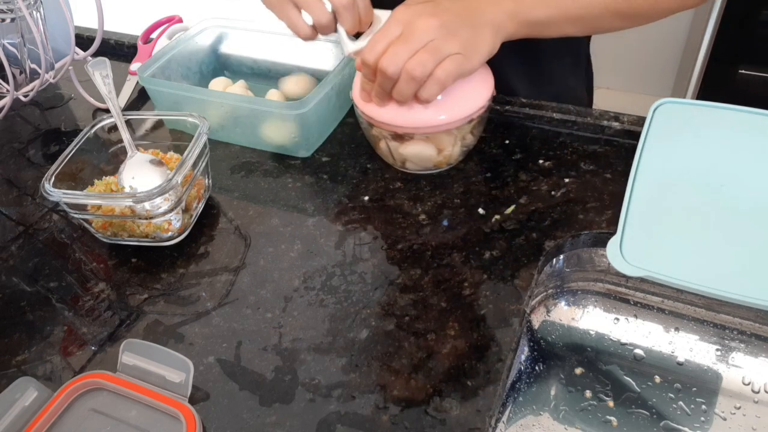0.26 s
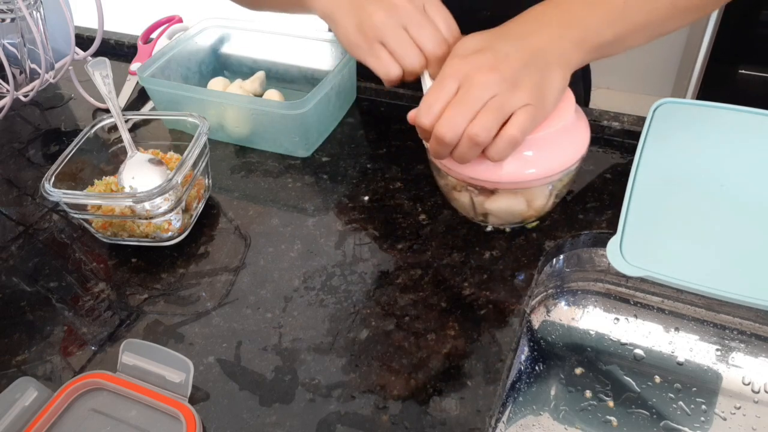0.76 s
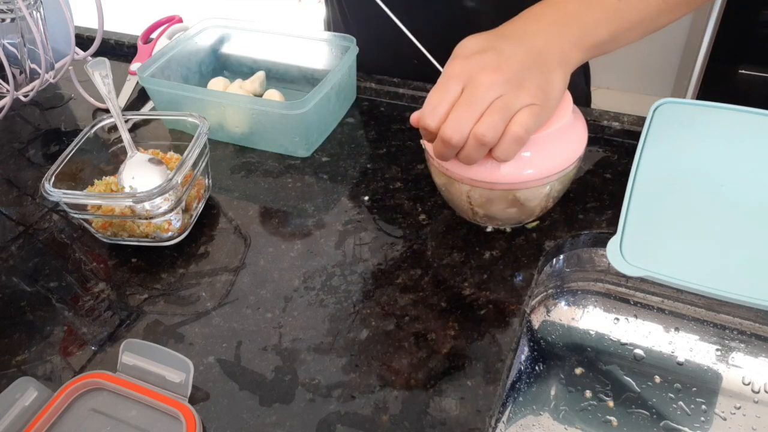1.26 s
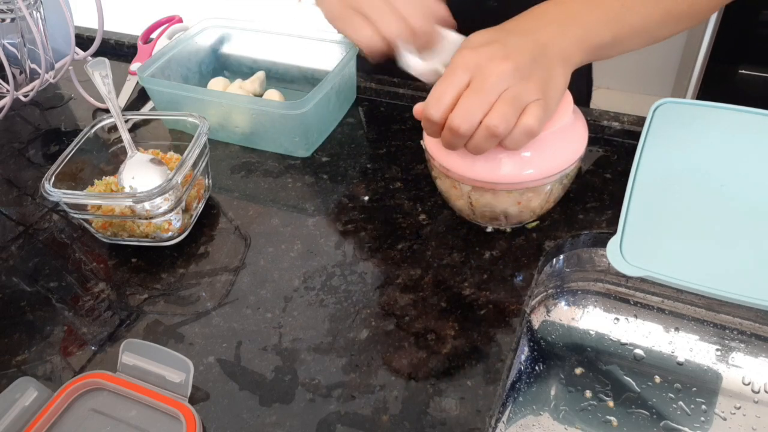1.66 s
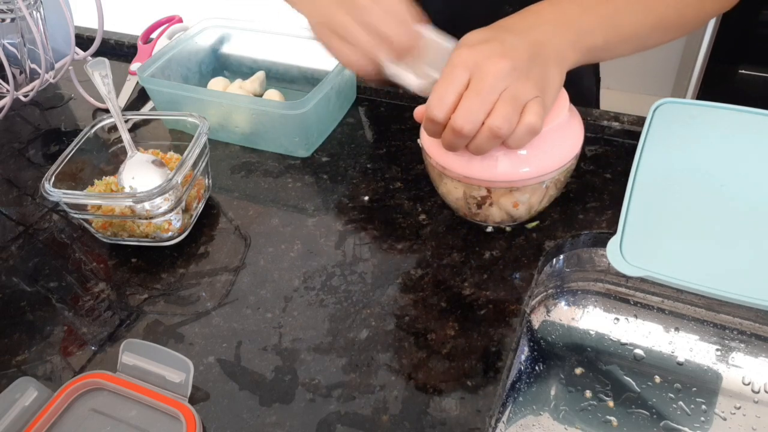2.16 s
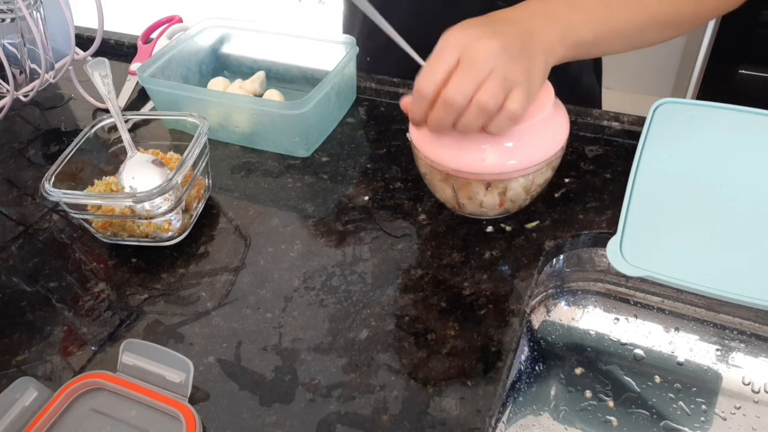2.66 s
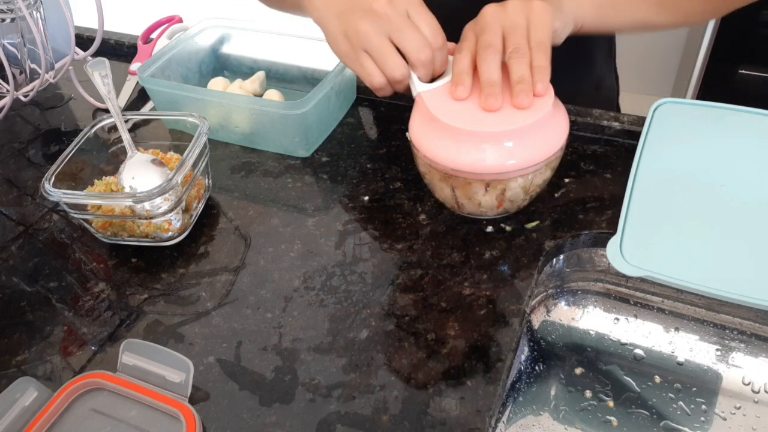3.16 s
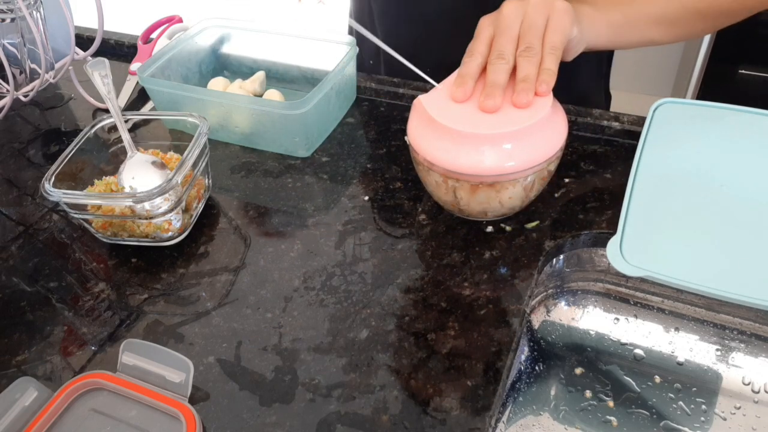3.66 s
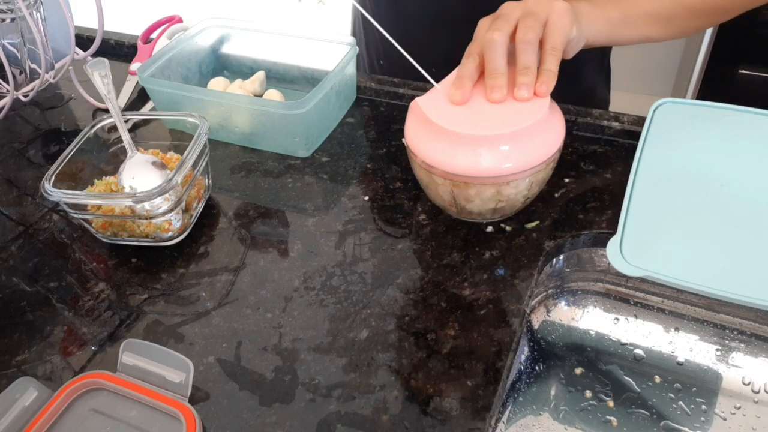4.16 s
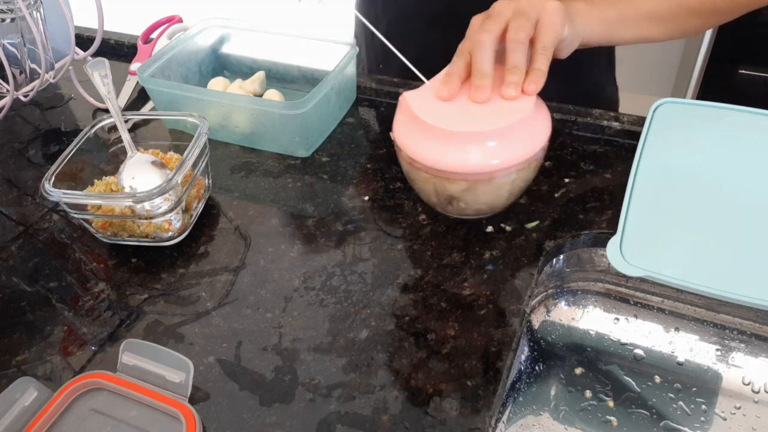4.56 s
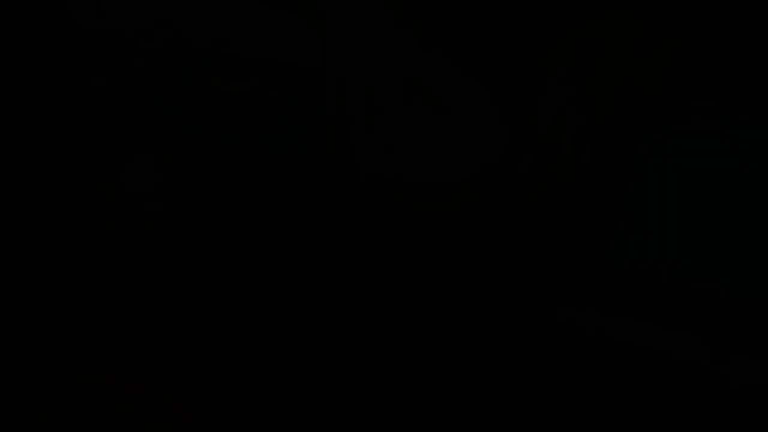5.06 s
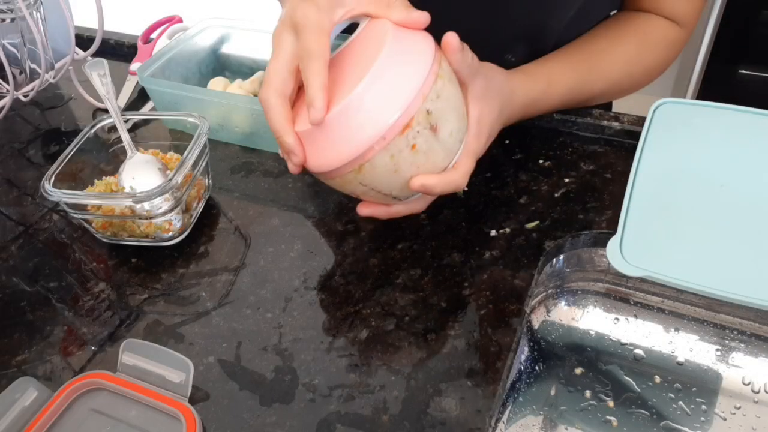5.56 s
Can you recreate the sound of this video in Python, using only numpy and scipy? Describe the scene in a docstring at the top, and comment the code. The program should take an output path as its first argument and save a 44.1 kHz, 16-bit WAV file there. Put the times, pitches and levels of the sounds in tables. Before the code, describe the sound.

In a small kitchen, close stereo microphones catch a plastic chopper knocked and shifted on a stone counter, then three rattling cord pulls with garlic hitting the bowl. Cord rewinds hiss and snap between them. A sharp knock leads to three more pulls, then a few loose knocks and quiet room tone.

```python
"""A faint hum and steady air noise fill a kitchen while a hand chopper is knocked about on a stone counter.
From about one second, six pulls of its cord throw garlic at the plastic bowl: random taps through resonances.
Between and after the pulls a spring rewinds the cord, which hisses, snaps and rings the lid.
More knocks, hard contacts with a short chatter, come near the middle and the end. Two microphones hear it all."""
import sys
import numpy as np
from scipy import signal
from scipy.fft import rfft, irfft
from scipy.io import wavfile
from scipy.ndimage import uniform_filter1d

SR = 44100
rng = np.random.default_rng(int(sys.argv[2]) if len(sys.argv) > 2 else 0)


def master(y):
    """Save y as 16-bit WAV."""
    cut = np.clip(np.atleast_2d(y).T, -1, 1)
    pcm = np.round(cut * 32767)  # scale
    wavfile.write(sys.argv[1], SR, pcm.astype(np.int16))


N = 255780  # samples, 5.8 s


def gain_of(db):
    """Turns decibels into gain."""
    return 10 ** (np.asarray(db) / 20)


def evened(x):
    """Scales a signal to an rms of 1."""
    return x / np.sqrt(np.mean(x ** 2) + 1e-20)


def read(points, hz):
    """Reads a table of values by frequency, with the frequencies spaced as on a log axis."""
    f, value = np.transpose(points)
    return np.interp(np.log(hz + 1), np.log(f + 1), value)


def columns(rows):
    """Draws every column of a table as a curve, one value per sample."""
    s, *values = np.transpose(rows)
    return [np.interp(np.arange(N) / SR, s, v) for v in values]


def kernel(spectrum, peaks=()):
    """Makes the sound of one tap, of energy 1, from a spectrum and resonance peaks."""
    hz = abs(np.fft.fftfreq(8192, 1 / SR))
    db = read(spectrum, hz) + sum(boost / (1 + (2 * (hz - f) / width) ** 2) for f, width, boost in peaks)
    log_gain = np.log(gain_of(np.maximum(db, -100)))
    # minimum phase: the sound starts at once and nothing comes before it
    h = np.fft.ifft(np.exp(np.conj(signal.hilbert(log_gain)))).real[:4096]
    return h / np.linalg.norm(h)


def ring(modes):
    """Adds up dying sines, of energy 1 together; a wider resonance dies sooner."""
    t = np.arange(3000) / SR
    h = sum(gain_of(db) * np.exp(-np.pi * width * t) * np.sin(2 * np.pi * hz * t) for hz, width, db in modes)
    return h / np.linalg.norm(h)


def through(x, h):
    """Passes every channel through one response."""
    return signal.oaconvolve(np.atleast_2d(x), h[None], axes=1)[:, :N]


def impacts(per_s, spread_db, smooth, alike, clump_db, clump_s):
    """Random taps of uneven size over smooth noise, in clumps; each microphone hears a share of its own."""
    luck, size, noise = rng.random((3, N)), rng.exponential(1, (3, N)), rng.standard_normal((4, N))
    sizes = gain_of(spread_db * np.minimum(size, 4))
    taps = np.sign(noise[:3]) * sizes * (luck < per_s / SR)
    width = max(round(clump_s * SR), 2)
    slow_noise = uniform_filter1d(uniform_filter1d(noise[3], width), width)
    clumps = gain_of(clump_db * evened(slow_noise))
    both, *own = evened((evened(taps) + smooth * noise[:3]) * clumps)
    # the taps land all round the bowl, but long waves reach both microphones alike
    own = signal.sosfilt(signal.butter(4, 480, "high", fs=SR, output="sos"), own)
    alike = np.clip(alike, 0, 1)
    return np.sqrt(alike) * both + np.sqrt(1 - alike) * own


# How strong the hum is. Each row: time in seconds, level in dB.
HUM_LEVELS = [(0.0, -54), (0.89, -53), (1.06, -67), (1.21, -49), (1.55, -63), (2.03, -60), (2.34, -66),
              (2.62, -46.5), (3.62, -54.5), (4.65, -46), (5.15, -65), (5.8, -59)]
# The colour of the room noise. Each row: frequency in Hz, relative level in dB per Hz.
AIR_COLOUR = [(15, -5), (25, -21), (65, -25), (103, -3.5), (131, 2.5), (192, -3.5), (232, -13), (339, -15),
              (2400, -40), (2670, -27), (5570, -30), (6040, -25), (8370, -42), (15200, -36), (16500, -72)]
AIR_DB, HUM_HZ, HUM_WANDER_HZ = -54, 86.6, 1.07


def background():
    """Steady room noise, alike in the bass, and a low hum that comes and goes and wanders in pitch."""
    a, b = rng.standard_normal((2, N))
    apart = signal.sosfilt(signal.butter(2, 350, "high", fs=SR, output="sos"), b - a)
    air = gain_of(AIR_DB) * through([a, a + apart], kernel(AIR_COLOUR))
    wander = evened(uniform_filter1d(rng.standard_normal(N), 6000))
    hum = np.sqrt(2) * np.sin(2 * np.pi * np.cumsum(HUM_HZ + HUM_WANDER_HZ * wander) / SR)
    return air + gain_of(columns(HUM_LEVELS)[0]) * hum


# How long the echoes last. Each row: frequency in Hz, time to fall by 60 dB in seconds.
ECHO_TIMES = [(150, 0.26), (500, 0.49), (2000, 0.39), (5000, 0.39), (12000, 0.15)]


def kitchen(x):
    """Sparse echoes of random sign, other ones for each microphone; each band dies at its own speed."""
    taps = np.zeros((2, SR))
    at = np.arange(100, SR - 20, 20) + rng.integers(0, 20, (2, (SR - 101) // 20))
    np.put_along_axis(taps, at, rng.choice([-1., 1.], at.shape), 1)
    hz, t, bands = signal.stft(taps, SR, nperseg=128)
    fade = gain_of(-60 * t / read(ECHO_TIMES, hz)[:, None])
    tail = signal.istft(bands * fade, SR, nperseg=128)[1]
    # both microphones share the bass
    tail[1] += signal.sosfiltfilt(signal.butter(2, 450, fs=SR, output="sos"), tail[0] - tail[1])
    return signal.fftconvolve(x[None], tail / np.linalg.norm(tail[0]), axes=1)[:, :N]


# Hands shifting the bowl on the counter. Each row: time in seconds, dull thuds in dB, sharp ticks in dB.
HANDLING = [(0.0, -36.5, -53), (0.12, -76, -67), (0.17, -31, -51), (0.22, -53, -72), (0.45, -35, -54),
            (0.69, -48.5, -61.5), (0.95, -54, -62), (3.0, -89, -55), (3.28, -52, -67.5), (3.31, -45.5, -57),
            (3.4, -80, -87), (5.4, -50.5, -53), (5.8, -60, -77)]


def handling_power():
    """Hands shift the bowl; gives the power of the thuds and the ticks."""
    return gain_of(columns(HANDLING)) ** 2


# Bowl, lid and handle knocked about. Each row: time in seconds, then in dB the crack, counter boom,
# body knock, lower lid ring, upper lid ring and loose rattle.
KNOCKS = [(0.0511, -54, -41, -30, -35, -41, -41), (0.1786, -32, -34, -21, -39, -33, -42),
          (0.2276, -5.5, -60, -9, -31, -18, -24), (0.247, -40, -50, -13, -45, -45, -40),
          (0.2683, -9.5, -60, -14, -46, -42, -23.5), (0.352, -45, -48, -27, -46, -48, -42),
          (0.3885, -35, -35, -24, -49, -23, -49), (0.4067, -33, -54, -41, -46, -41, -50),
          (0.4464, -42, -49, -38, -29, -31, -45), (0.4823, -22.5, -46, -29, -24.5, -46, -34),
          (0.4978, -19.5, -39, -18, -25, -18, -39), (0.548, -43, -47, -20.5, -50, -40, -54),
          (0.684, -47, -32, -35, -61, -55, -51), (0.8101, -37, -32.5, -53, -40, -60, -45.5),
          (2.8902, -13.5, -55, -22.5, -54, -11, -31.5), (2.9076, -20, -55, -32, -48, -27, -52),
          (3.268, -56, -51, -57, -48, -39, -61), (3.3014, -36, -38, -38, -44, -48, -50),
          (5.2178, -12.5, -49, -44, -20, -38, -27.5), (5.247, -11, -51, -36, -51, -49, -29),
          (5.2644, -4.5, -59, -39, -18.5, -20, -45), (5.2671, -6.5, -59, -42, -17, -25, -32),
          (5.6092, -58, -38, -66, -58, -59, -73), (5.7244, -63, -30.5, -62, -67, -59.5, -58.5)]


def knock_blows():
    """Lists the knocks as rows for blows(), with a fine tick softer than the crack."""
    return [(s, crack, *parts, crack - 26) for s, crack, *parts, _ in KNOCKS]


def column(values):
    """Stands values up, one below the other."""
    return np.reshape(values, (-1, 1))


# What a knock shakes loose, against its rattle level. In order: thuds, ticks, hiss, lower and upper ring, in dB.
RATTLE_DB = [-10, -15, -13, -16, -21]
# How fast each of these fades, in dB per second.
RATTLE_FADE = [119, 160, 147, 117, 180]


def rattle_shapes(t):
    """Each knock shakes loose parts, which rattle and fade; gives start and levels in dB."""
    shapes = []
    for s, *_, rattle_db in KNOCKS:
        fade_db = column(RATTLE_FADE) * np.maximum(t - s, 0)
        shapes.append((s, rattle_db + column(RATTLE_DB) - fade_db))
    return shapes


REGRIP_S = 2.85  # the hand on the lid goes flat: the upper ring takes over from the lower


def lid_rings(s, db, muted_db):
    """Levels of the lower and the upper ring; the hand holds one of them down."""
    return (db, db + muted_db) if s < REGRIP_S else (db + muted_db, db)


# The rewinding cord catches and snaps against the lid. Each row: time in seconds, crack in dB, lid ring in dB.
SNAPS = [(1.505, -12, -9), (1.5374, -17, -9), (1.5135, -20, -10), (1.548, -22, -12), (2.1465, -9, -5),
         (2.1561, -24, -10), (2.181, -28, -14), (2.1724, -26, -13), (2.1884, -29, -19), (2.2494, -18, -25),
         (2.7057, -10.5, -10.5), (3.7803, -6.5, -6), (4.3495, -15, -5), (4.374, -12, -6), (4.9374, -18, -6),
         (4.9594, -16, -6), (4.9806, -14, -5), (5.0544, -15, -22)]
SNAP_BODY_DB = -14  # body knock against crack; the boom lies as far below again


def snap_blows():
    """Lists the snaps of the cord as rows for blows()."""
    return [(s, crack, crack + 2 * SNAP_BODY_DB, crack + SNAP_BODY_DB, *lid_rings(s, lid, -18), crack - 15)
            for s, crack, lid in SNAPS]


# The hardest cloves the blades strike. Each row: time in seconds, crack in dB, thump in dB, lid ring in dB.
STRIKES = [(0.9764, -28, -28, -41), (1.0093, -22, -16, -30), (1.1394, -8.5, -10.5, -17),
           (1.1815, -21, -27, -18), (1.2042, -10.5, -40, -30), (1.2831, -11.5, -14, -35),
           (1.3546, -7, -19, -26), (1.7685, -26, -39, -38), (1.995, -16.5, -20, -30),
           (2.437, -18, -36, -36), (3.97, -26, -33, -25), (1.846, -9, -11, -21), (2.3294, -30, -23.5, -34),
           (2.3847, -22, -22, -26), (2.4735, -2, -16, -10), (3.3688, -47, -30, -37),
           (3.3991, -31, -30, -43), (3.4253, -22, -20, -20), (3.5272, -9, -18, -12), (4.075, -26, -20, -39),
           (4.1953, -10, -24, -33), (4.7072, -14, -24, -9)]


def strike_blows():
    """Lists the strikes of the blades as rows for blows(), the boom 2 dB below the thump."""
    return [(s, crack, thump - 2, thump, *lid_rings(s, lid, -12), crack - 25)
            for s, crack, thump, lid in STRIKES]


# How the counter rings. Each row: frequency in Hz, width in Hz, relative level in dB.
COUNTER = [(123, 49, -18), (192.5, 4.7, -9), (324, 170, 6.5)]
# How the hollow body rings. Each row: frequency in Hz, width in Hz, relative level in dB.
BODY = [(424, 79, -33), (560, 22, 6), (694, 280, 29.5), (970, 140, 12.5)]


def blows():
    """Each blow is one hard contact and a few milliseconds of chatter into every part of the chopper."""
    # each row: seconds, then crack, boom, body, lower ring, upper ring and fine tick in dB
    s, *parts_db = np.transpose(knock_blows() + strike_blows() + snap_blows())
    t = np.arange(500) / SR
    bursts = .25 * rng.standard_normal((len(s), 2, len(t))) * np.exp(-t / .002)
    bursts[:, :, 0] = 1  # the contact itself
    at = np.round(s * SR).astype(int)[:, None] + np.arange(len(t))
    parts = [kernel(TICK, BOWL), ring(COUNTER), ring(BODY), ring(LID_LOW), ring(LID_HIGH), kernel(HISS)]
    chatters = [1, 0.13, 0.051, 0.15, 0.2, 0.17]  # share of the chatter that each part feels
    out = np.zeros((2, N))
    for h, db, chatter in zip(parts, parts_db, chatters):
        weight = np.where(t > 0, chatter, 1) * gain_of(db)[:, None]
        drive = np.zeros((2, N))
        for ear in range(2):
            np.add.at(drive[ear], at, bursts[:, ear] * weight)
        out += through(drive, h / abs(h).max())
    return out


# The spring winds the cord back. Each row: start in seconds, catch in seconds, length of the run in seconds,
# how many times the usual braking, then in dB the dull thuds, sharp ticks, hiss, lower and upper lid ring.
REWINDS = [(1.434, 1.501, 0.06, 1.01, -33.5, -33, -30.5, -32, -32),
           (2.066, 2.151, 0.035, 0.94, -35, -30.5, -28, -22.5, -53),
           (2.217, 2.253, 0.018, 1.44, -40, -29.5, -30, -22.5, -35.5),
           (2.627, 2.701, 0.085, 1.23, -33, -34, -30, -22.5, -45),
           (3.705, 3.772, 0.076, 1, -31, -28.5, -27.5, -42, -33.5),
           (4.285, 4.35, 0.1, 1.6, -33, -29, -29, -43, -31),
           (4.89, 4.937, 0.06, 1.05, -33, -28, -26, -42, -29),
           (4.975, 5.037, 0.031, 4.3, -41, -28.5, -30, -29.5, -28.5),
           (5.06, 5.108, 0.043, 0.75, -49.5, -56, -40, -29.5, -55)]
# The five sounds before the catch. Each row: level at the start in dB, level just before the catch in dB,
# both against the row above and never over it.
WIND_UP = [(19, 16), (-25, 3.5), (-13, -1), (-17, -19), (-4, -22)]
# How fast each of the five sinks while the cord runs, in dB per second.
RUN_SAG = [31, 7.7, 30, 180, 24]
# How fast each of the five sinks when the cord slows, in dB per second before the braking multiplies it.
SLACK = [54, 124, 129, 119, 124]


def rewind_shapes(t):
    """The cord winds up, catches, runs and slows; gives start and levels in dB."""
    first_db, last_db = map(column, np.transpose(WIND_UP))
    shapes = []
    for start, catch, run, braking, *levels_db in REWINDS:
        before = first_db + (last_db - first_db) * (t - start) / (catch - start)
        running = column(RUN_SAG) * np.minimum(t - catch, run)
        slowing = braking * column(SLACK) * np.maximum(t - catch - run, 0)
        shape = np.where(t < catch, np.minimum(before, 0), -running - slowing)
        shapes.append((start, column(levels_db) + shape))
    return shapes


# The colour of the cord's hiss. Each row: frequency in Hz, relative level in dB per Hz.
HISS = [(2060, -31), (3500, -1), (4330, 4.5), (4650, -2), (5390, 7.5), (6750, -1), (7340, 5), (8900, -3),
        (12000, 6), (13400, -6), (15300, -0.5), (16000, -27), (16300, -58)]
# The lower ring of the lid. Each row: frequency in Hz, width in Hz, relative level in dB.
LID_LOW = [(1575, 20, 14.5), (1706, 32.6, 14), (1770, 40, -10)]
# The upper ring of the lid. Each row: frequency in Hz, width in Hz, relative level in dB.
LID_HIGH = [(2054, 103, 21), (2200, 120, 15)]


def cord(hiss, low, high):
    """Fine friction hisses, and its coarser slips ring the lid."""
    fine = impacts(per_s=5200, spread_db=8.5, smooth=1.0, alike=0.05, clump_db=2.5, clump_s=0.016)
    slips = impacts(per_s=320, spread_db=4.0, smooth=0.82, alike=0.37, clump_db=-0.5, clump_s=0.014)
    rings = through(low * slips, ring(LID_LOW)) + through(high * slips, ring(LID_HIGH))
    return through(hiss * fine, kernel(HISS)) + rings


# The pulls of the cord. Each row: start in seconds, rise in seconds, hold in seconds, fastest moment in seconds,
# then in dB the dull thuds, sharp ticks, hiss, lower lid ring and upper lid ring.
PULLS = [(0.969, 0.067, 0.29, 1.25, -17.5, -26, -57, -55, -51),
         (1.753, 0.086, 0.13, 1.87, -18.5, -25, -30, -25, -38),
         (2.331, 0.066, 0.15, 2.47, -20.5, -25.5, -37, -29, -34),
         (3.349, 0.11, 0.17, 3.53, -24, -27.5, -33.5, -39, -27),
         (3.997, 0.061, 0.12, 4.14, -21, -23, -34, -29.5, -26),
         (4.555, 0.14, 0.067, 4.72, -19.5, -22.5, -30, -35, -29)]
# How steeply each of the five sounds follows the pull, as a factor.
PULL_DEPTH = [1.05, 1.27, 0.94, 0.91, 1.9]
# How fast each of the five sinks either side of the fastest moment, in dB per second.
PEAK_SIDES = [2.4, 11, 153, 29, 100]


def pull_shapes(t):
    """A pull swells, holds and falls once the hand stops; gives start and levels in dB."""
    shapes = []
    for start, rise, hold, fastest, *levels_db in PULLS:
        end = start + rise + hold
        # before the depth factor: 15 dB down at the start, falling 147 dB per second after the end
        swell = -15 * np.clip(1 - (t - start) / rise, 0, 1) - 147 * np.maximum(t - end, 0)
        off_peak = abs(np.clip(t, start, end) - fastest)
        db = column(levels_db) + column(PULL_DEPTH) * swell - column(PEAK_SIDES) * off_peak
        shapes.append((start, db))
    return shapes


def effort():
    """Adds pulls, rewinds, rattle and handling in power; gives six gains over time."""
    t = np.arange(0, N + 32, 32) / SR
    rattles = rattle_shapes(t)
    shapes = pull_shapes(t) + rewind_shapes(t) + rattles
    power = sum(gain_of(db) ** 2 * (t >= start) for start, db in shapes)
    shaken = sum(gain_of(db[0]) ** 2 * (t >= start) for start, db in rattles)
    # thuds, ticks, hiss, lower ring, upper ring, and the dull rattle of the knocks alone
    powers = np.array([np.interp(np.arange(N) / SR, t, p) for p in [*power, shaken]])
    powers[:2] += handling_power()
    return np.sqrt(powers)


# The colour of the dull thuds. Each row: frequency in Hz, relative level in dB per Hz.
THUD = [(35, -83), (60, -18.5), (183, -1), (279, -6.5), (464, -7.5), (521, -9.5), (1050, -7), (1240, -16.5),
        (1530, -8.5), (1780, -11), (1990, -15), (2420, -18.5), (3000, -20.5), (3900, -39.5), (6600, -120)]
# The colour of the sharp ticks. Each row: frequency in Hz, relative level in dB per Hz.
TICK = [(760, -33.5), (1300, -17.5), (1540, -4), (1770, -9.5), (2030, -3), (2420, -9.5), (4230, -7.5),
        (6140, -18.5), (8350, -28), (12000, -21.5), (15600, -39), (22000, -120)]
# Bowl and counter resonances on the rattle. Each row: frequency in Hz, width in Hz, boost in dB.
BOWL = [(125.6, 10.2, 9), (169, 26.6, 8), (363, 167, 8), (446, 136, 4.5), (592, 74, 5.5), (663, 18.4, 9),
        (822, 20, 5.5), (2570, 490, 3), (3650, 610, 3), (4300, 79, 4.5), (5800, 160, 1.5)]
RUMBLE_DB = -3  # the counter under the thuds


def churn(dull, sharp, shaken):
    """Garlic hits the bowl, dull and sharp, and shakes the counter; knocks also sound the hollow body."""
    hits = impacts(per_s=500, spread_db=3.5, smooth=0.59, alike=0.43, clump_db=2.5, clump_s=0.011)
    bowl = through(dull * hits, kernel(THUD, BOWL)) + through(sharp * hits, kernel(TICK, BOWL))
    rumble = gain_of(RUMBLE_DB) * through(dull * hits, ring(COUNTER[1:2]))
    hollow = through(shaken * hits, ring(BODY))
    return bowl + rumble + hollow


RIGHT_LAG, ECHO_DB, BASS_CUT_HZ = 6, -5.5, 78.4  # lag in samples


def scene():
    """The chopper, its echoes and the room."""
    gains = effort()
    left, right = churn(*gains[[0, 1, 5]]) + cord(*gains[2:5]) + blows()
    direct = np.array([left, np.roll(right, RIGHT_LAG)])  # the two microphones stand a little apart
    chopper = direct + gain_of(ECHO_DB) * kitchen((left + right) / 2)
    # deep bass is cut from the chopper's sounds; the room noise keeps its own
    bass_cut = signal.butter(4, BASS_CUT_HZ, "high", fs=SR, output="sos")
    return signal.sosfilt(bass_cut, chopper) + background()


# How the microphones differ in colour. Each row: frequency in Hz, left over right in dB.
LEFT_OVER_RIGHT = [(60, -3), (180, -2), (550, -3.5), (1650, -3), (4970, -3.0), (15000, -6)]
EDGE_HZ = 16500  # the treble ends here


def record(dry):
    """The two microphones differ in colour, the hardest peaks round off; then the treble is cut."""
    half_db = read(LEFT_OVER_RIGHT, np.fft.rfftfreq(N, 1 / SR)) / 2
    coloured = irfft(rfft(dry) * gain_of([half_db, -half_db]), N)
    rounded = coloured / (1 + abs(coloured / .9) ** 4) ** .25
    band_limit = signal.firwin(511, EDGE_HZ, window=("kaiser", 9), fs=SR)
    return signal.oaconvolve(rounded, band_limit[None], "same")


dry = scene()
out = record(dry)
master(out)
```